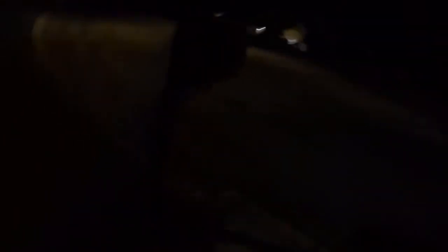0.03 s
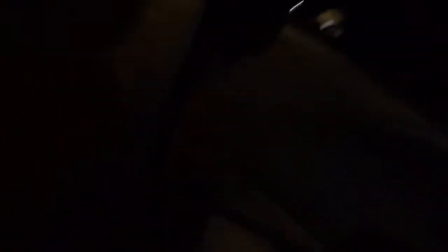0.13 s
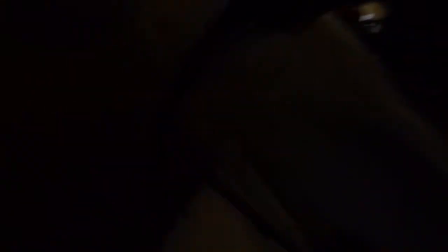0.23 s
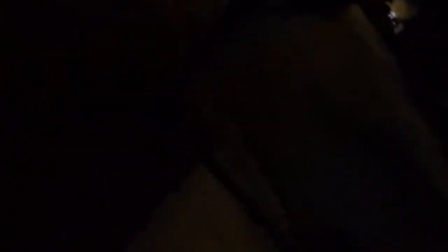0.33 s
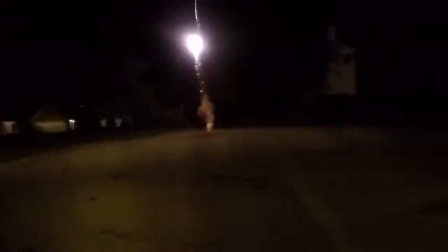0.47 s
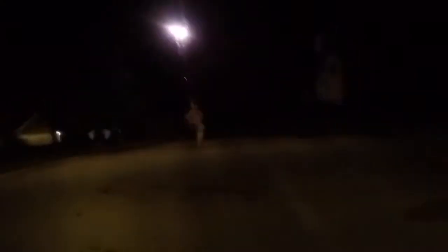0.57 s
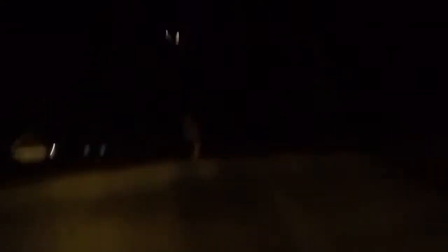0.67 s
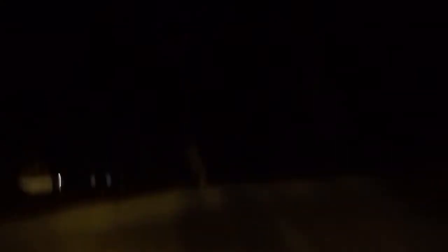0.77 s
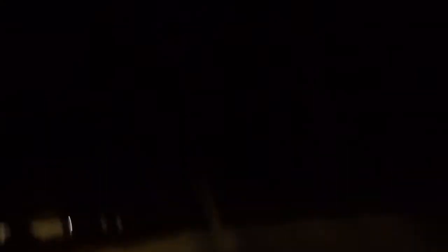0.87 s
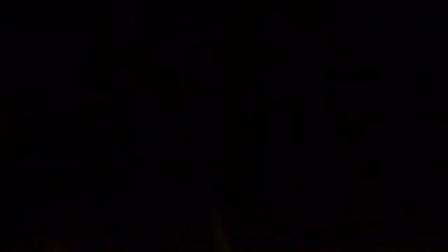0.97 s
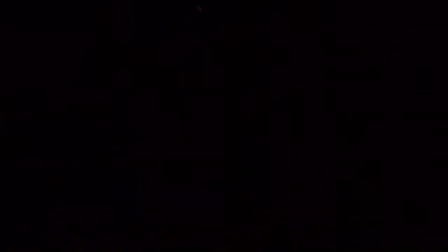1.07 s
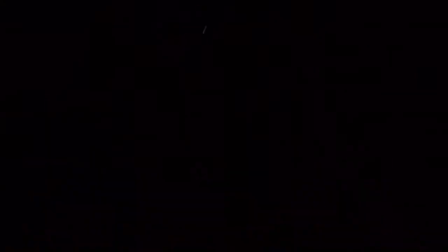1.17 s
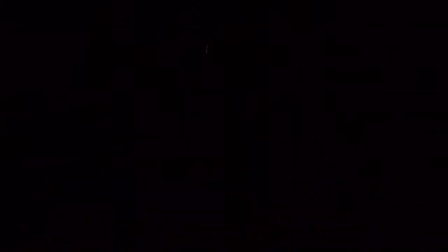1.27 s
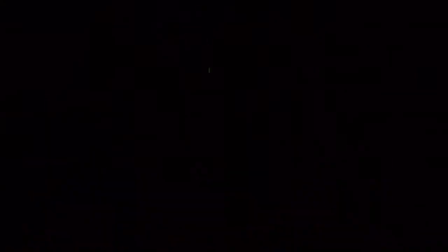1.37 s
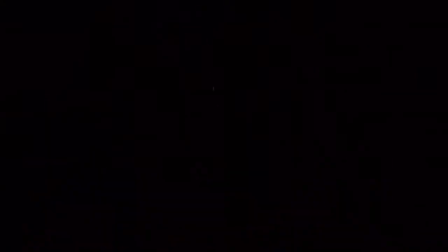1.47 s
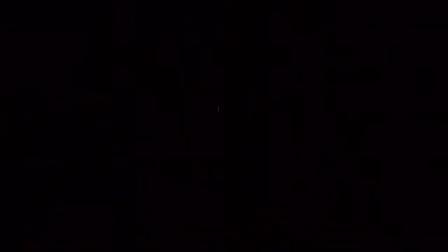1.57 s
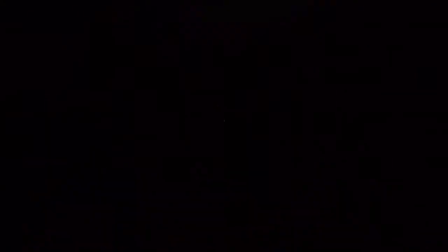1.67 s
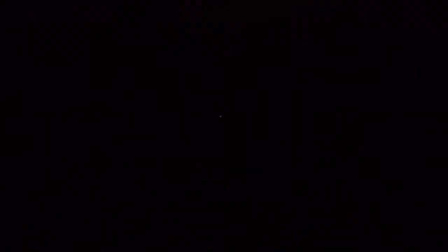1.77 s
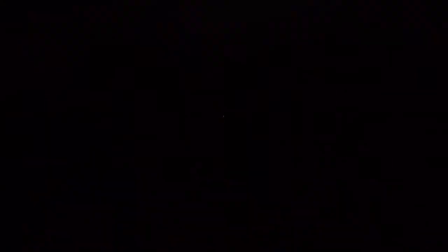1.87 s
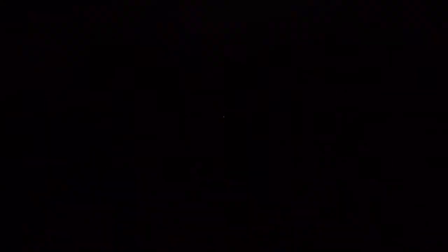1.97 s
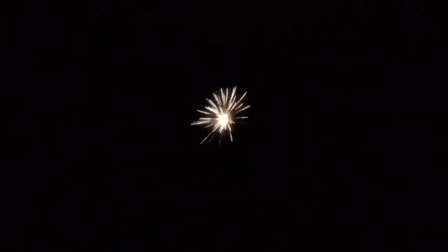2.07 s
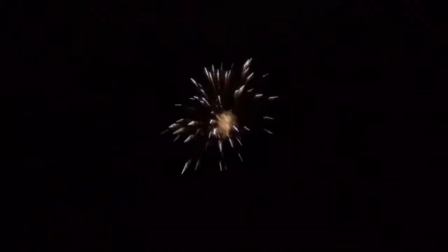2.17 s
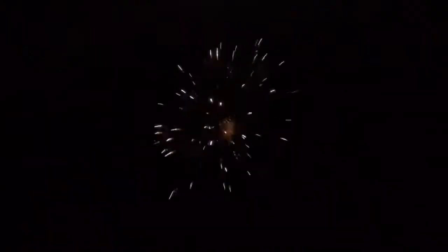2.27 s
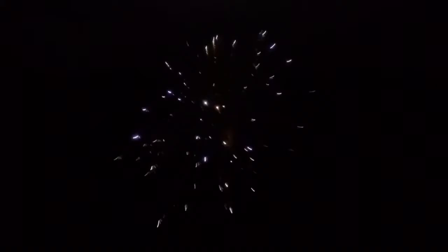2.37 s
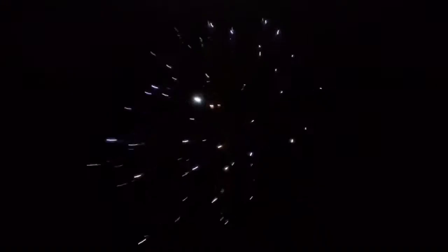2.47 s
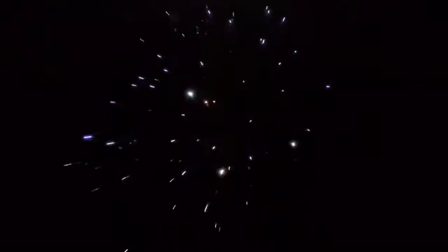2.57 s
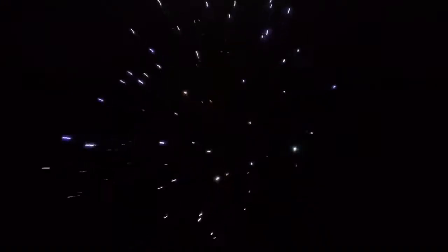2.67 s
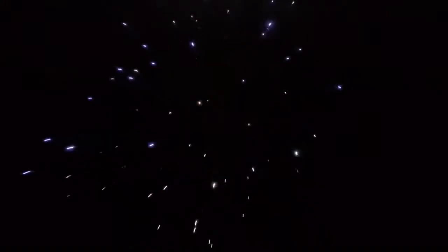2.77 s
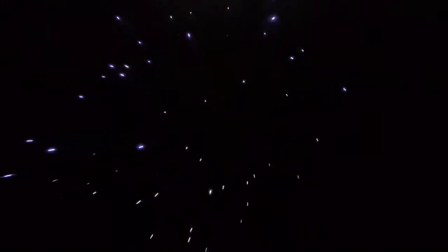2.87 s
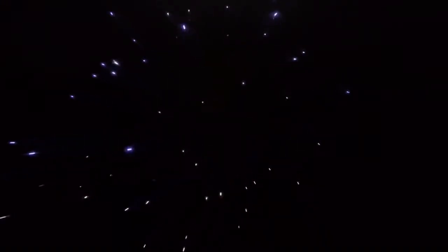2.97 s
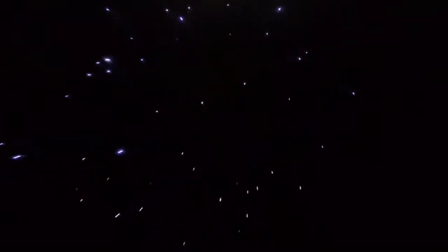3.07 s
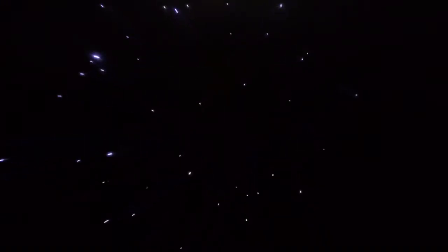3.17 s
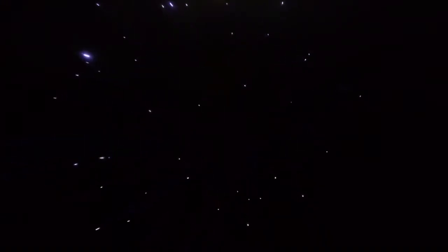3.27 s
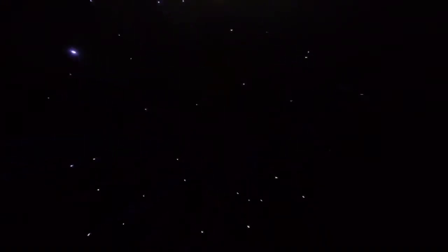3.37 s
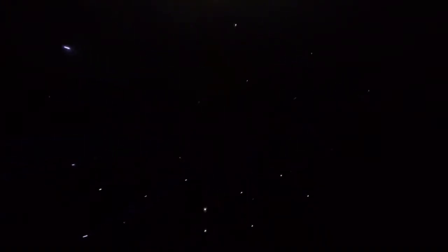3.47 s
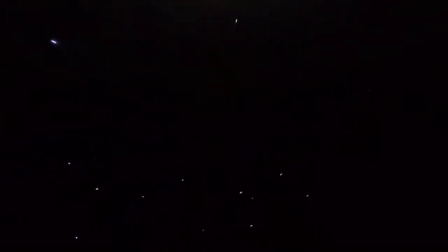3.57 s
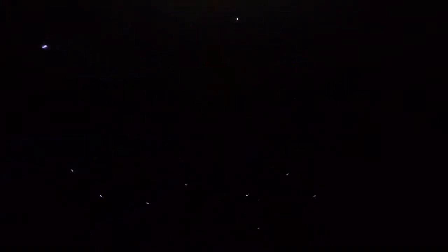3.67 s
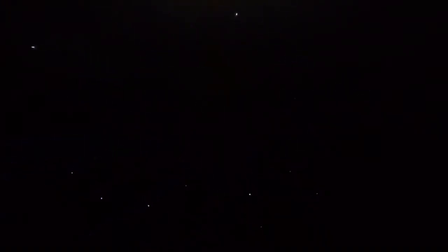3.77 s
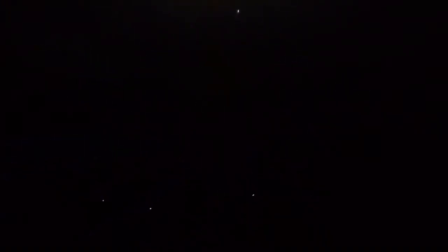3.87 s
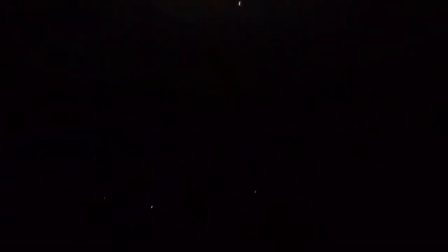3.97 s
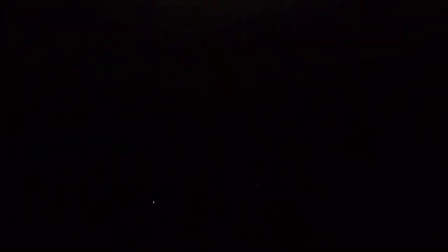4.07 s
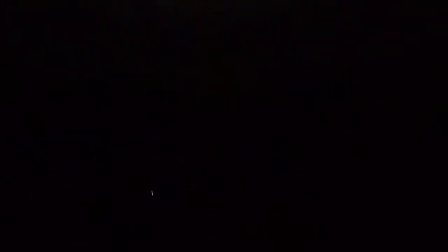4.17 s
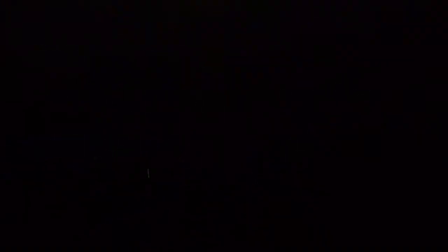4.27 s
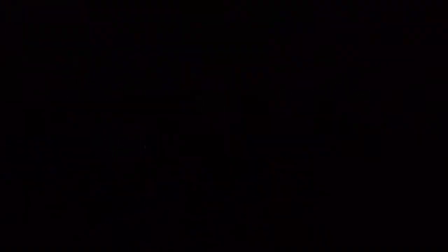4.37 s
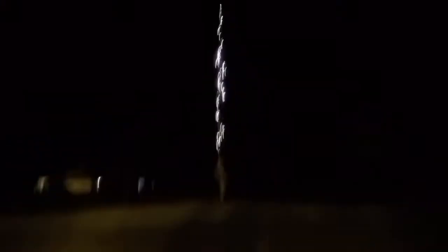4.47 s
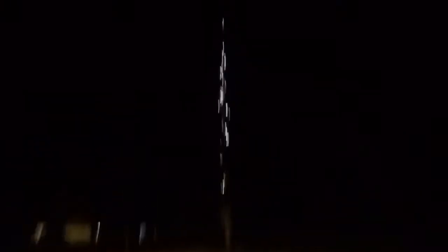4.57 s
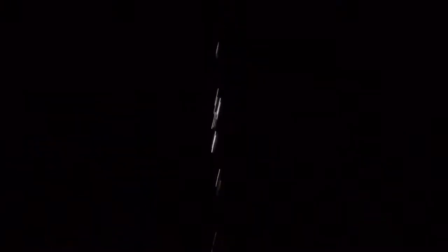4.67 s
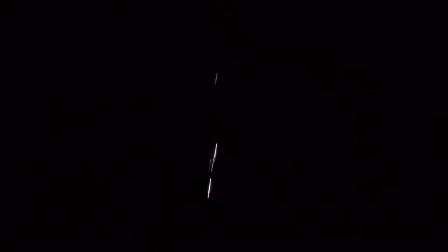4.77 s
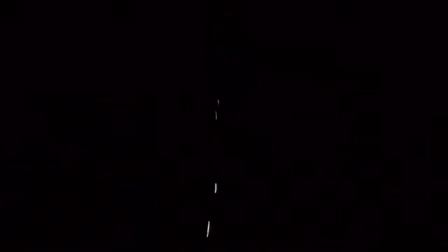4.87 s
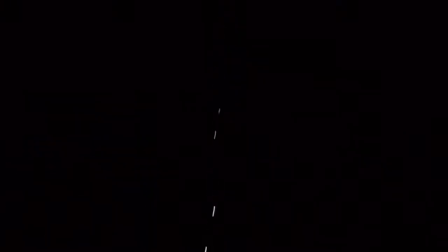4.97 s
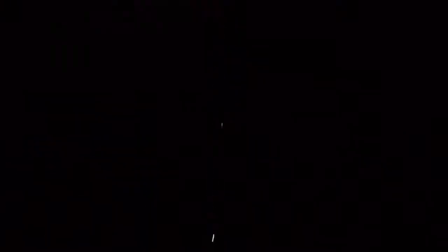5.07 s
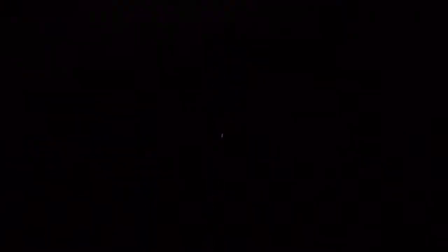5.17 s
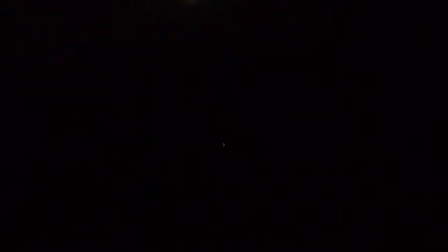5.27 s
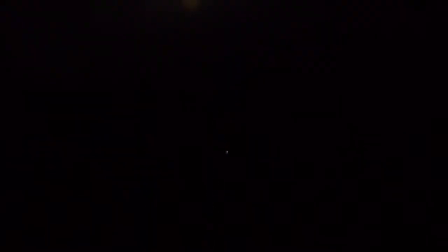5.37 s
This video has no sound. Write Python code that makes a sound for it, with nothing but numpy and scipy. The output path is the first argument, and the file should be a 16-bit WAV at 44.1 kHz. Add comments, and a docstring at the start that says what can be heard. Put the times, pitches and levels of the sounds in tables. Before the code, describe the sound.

Outdoors at night, a hand-held microphone is rubbed and knocked while a cricket trills. At half a second a launch thumps and cracks with a short echo. After a rumbling breeze, a shell bursts overhead at 2.2 seconds, very sharp, its echo swelling and rolling away. Insects creep back; a softer launch thumps at 4.5, then crickets and a light handling knock.

```python
"""Small fireworks at night

Two launches thump and one shell cracks overhead over an open lot: damped pressure swings, two-lobed pulses, crackle.
Each returns from the trees as a swelling, rolling echo made of shaped noise. Noise bands form the distant
insects and a nearer hissing one; sagging tones form a cricket's trills at the start and the end.
A breeze rumbles on the ports of a hand-held microphone, jostled mostly at first by rubs and knocks.
The recorder's gain control ducks at each shot and slowly lets the night back in."""
import sys
import numpy as np
from scipy import signal
from scipy.fft import rfft, irfft, next_fast_len
from scipy.io import wavfile
from scipy.ndimage import uniform_filter1d, minimum_filter1d

SR = 44100
rng = np.random.default_rng(int(sys.argv[2]) if len(sys.argv) > 2 else 0)


def wav_record(signal):
    """Record a signal, one row per channel, as 16-bit PCM in the file named by sys.argv[1]."""
    frames = np.transpose(np.atleast_2d(signal))
    bounded = np.clip(frames, -1, 1)
    # unit amplitude maps onto the largest positive 16-bit level
    quanta = np.round(bounded * 32767).astype(np.int16)
    wavfile.write(sys.argv[1], SR, quanta)


N = 238889
TIME = np.arange(N) / SR

# Breeze on the ports, and a far rumble that gathers before the burst: start_s, level_db
BREEZE_LEVEL = [(0, -16.5), (.12, -11.5), (.22, -12), (.27, -15.5), (.4, -11.5), (.5, -38), (1, -32.5),
                (1.12, -27), (1.38, -23), (1.5, -21), (1.62, -24.5), (1.88, -24), (1.97, -32.5),
                (2.13, -27), (2.3, -43), (2.45, -23), (3, -31), (3.75, -33), (4, -38), (4.45, -32),
                (4.65, -26), (5.42, -25.5)]
RUMBLE_LEVEL = [(1, -59), (1.35, -41.5), (1.5, -55.5), (1.74, -56), (1.8, -53), (1.88, -43), (1.95, -45.5),
                (2.12, -47), (2.5, -70)]
# Spectra of wind, rumble and the hush of the night: frequency_hz, relative density_db (per Hz)
WIND_COLOUR = [(12, -7.5), (28, -2.5), (42, 1.5), (60, -15.5), (85, -22), (150, -33), (250, -40),
               (450, -52), (1000, -56), (3000, -90)]
RUMBLE_COLOUR = [(50, -11), (110, 2.5), (180, 0), (300, -9.5), (450, -20), (900, -37), (3000, -65)]
NIGHT_COLOUR = [(40, 7.5), (150, -10), (260, -7), (450, -8.5), (900, -29), (1500, -38), (2500, -16.5),
                (5000, -65), (9000, -41.5), (16000, -86)]
# Swells of the insect chorus, and bouts of the nearer insect: start_s, length_s, level_db
CHORUS_WAVES = [(-.3, 0.057, -45.5), (1.385, 0.42, -52.5), (3.244, 0.74, -55), (4.99, 0.24, -52.5)]
BUZZ_BOUTS = [(-.1, 0.3, -46.5), (2.118, 0.1, -52), (5.058, 0.4, -50)]
# Spectra of the chorus, far crickets and nearer insect: frequency_hz, relative density_db (per Hz)
CHORUS_COLOUR = [(1000, -27), (1700, -11), (2150, -1), (2450, -8.5), (3100, 2), (3800, -3), (4700, 2.5),
                 (5600, 1), (6400, -6), (7000, -23), (8300, -37), (9700, -24), (13000, -28), (16000, -38)]
CRICKET_COLOUR = [(4500, -49), (5500, -7), (5850, 8), (6150, 6.5), (6400, -0.5), (6800, -31), (8500, -69)]
BUZZ_COLOUR = [(3500, -23), (4600, -4.5), (5300, -4), (6050, 5), (6500, -11), (7500, -20), (9000, -35),
               (13000, -50), (16000, -66)]
# The hand slides on the case: middle_s, half_length_s, rub_db, swish_db
HAND_RUBS = [(0.004, 0.022, -5.5, -34.5), (0.049, 0.019, -19, -23), (0.073, 0.023, -5.5, -40),
             (0.15, 0.087, -40, -42), (0.27, 0.028, -29, -58.5), (0.342, 0.0076, -18.5, -57)]
# Finger knocks on the case: start_s, level_db, pitch_hz, clack_db, tick_db, left_minus_right_db,
# far_port_share (-1 to 1, negative pushes the ports opposite ways)
FINGER_KNOCKS = [(.001, -2.5, 230, -16.5, -12.5, -2.5, -0.71), (0.066, -6, 90, -12.5, -25, -11, -0.55),
                 (0.127, -1.5, 24.3, -20, -14, 5, 0.86), (0.199, -18, 109, -42.5, -56, 10, 0.8),
                 (0.2293, -3, 370, -27, -58, -2.5, -0.4), (0.2318, 1.5, 114, -45, -60, 4.5, -0.78),
                 (0.252, -10, 176, -44, -53, -2, -0.4), (0.274, -5, 191, -49, -62, 0, -0.5),
                 (0.277, -4, 32.2, -48, -60, 6, 0.15), (0.286, -14, 340, -50, -58, 0, -0.89),
                 (0.333, -18, 202, -37, -57, 6, -0.23), (0.387, -1, 57.4, -39, -44, 1.5, -0.56),
                 (1.792, -40, 230, -56, -65, -6, -0.96), (1.97, -32, 218, -60, -68, -6, -0.88),
                 (2.135, -32, 230, -57, -63, 0, -0.77), (5.279, -45, 200, -42, -36, -8, -0.5),
                 (5.409, -20.5, 280, -29.5, -49, -14, 0.36)]
# Spectra of rub and swish: frequency_hz, relative density_db (per Hz)
RUB_COLOUR = [(40, 17), (90, 7.5), (180, -6.5), (330, 4.5), (520, -4.5), (700, -11), (950, -10.5),
              (1300, -8.5), (1800, -24), (2300, -23), (3200, -39), (8000, -71)]
SWISH_COLOUR = [(800, 5.5), (2000, 6.5), (3800, -5), (5800, 5.5), (7500, -2.5), (10000, -19), (13000, -27),
                (16000, -43)]
# Trills of the near cricket: start_s, length_s, first_rate_hz, last_rate_hz (wing strokes),
# first_level_db, last_level_db
CRICKET_TRILLS = [(.097, .315, 61.5, 55.5, -36.5, -43), (5.204, .21, 55.2, 55.2, -42, -34)]
# Echoes that swell, fade and roll on: start_s, swell_s, boom_db, roar_db, boom_fade_db_per_s, roar_fade_db_per_s,
# roll_below_peak_db, roll_fade_db_per_s, dulling_db_per_s, ground_bounce (0 to 1), bounce_lag_s, grain_db, lumps_db
LAUNCH_ECHO_ROWS = [(0.464, 0.037, -18.5, -28, 38, 21, 29, 13.5, 49, 0.38, 0.0033, 1.5, 0.2),
                    (0.645, 0.013, -18, -28, 61, 58.5, 17.5, 40, -1, 1, 0.0033, 1.5, 0.6),
                    (4.502, 0.035, -30, -38, 44, 43.5, 17.5, 0.5, 24, 0.25, 0.00236, 1, 0.74)]
BURST_ECHO_ROWS = [(2.229, 0.064, -21, -29, 77, 26, 75, 60, 49, 0.14, 0.003, 0.8, 0.13),
                   (2.3, 0.16, -13, -23, 72, 43.4, 7.97, 14.83, 20.4, 0.033, 0.00334, 0.92, 0.2)]
# Spectra of the echoes' low boom and higher roar: frequency_hz, relative density_db (per Hz)
LAUNCH_BOOM_COLOUR = [(40, -12.5), (85, 2.5), (135, 2), (200, -3.5), (300, -11.5), (390, -20), (520, -20),
                      (750, -58), (1500, -86)]
LAUNCH_ROAR_COLOUR = [(250, -17), (400, -1), (600, 1.5), (790, 0), (950, 1), (1400, 0.5), (2100, -2),
                      (2800, -4), (3400, -3.5), (4400, -5.5), (5900, -4), (7200, -8.5), (8500, -20),
                      (10500, -31.5), (13000, -40), (16000, -50)]
BURST_BOOM_COLOUR = [(40, -14.5), (90, -3.5), (140, -4), (220, -2.5), (300, -3), (410, -5), (540, -18),
                     (800, -17.5), (1500, -74)]
BURST_ROAR_COLOUR = [(250, -30), (500, -1.5), (680, -7), (950, 2.5), (1400, -1), (2250, -3.5), (2900, -4),
                     (3400, -5.5), (4400, -7), (5900, -5), (7200, -8.5), (8500, -21), (10500, -31),
                     (13000, -37.5), (16000, -48)]
# Low bodies of the reports: start_s, level_db, pitch_hz
REPORT_THUMPS = [(0.475, -10.5, 178), (0.497, -11, 302), (0.502, -8.5, 186), (.527, -7.5, 172),
                 (0.577, -9, 153), (0.621, -14, 140), (0.665, -0.5, 133), (0.679, -4, 139),
                 (0.686, -2, 161), (0.734, -11, 190), (0.755, -8, 137), (0.784, -12, 141),
                 (2.1995, -24, 400), (2.204, -16, 200), (2.2105, -3, 170), (2.2114, -9, 440),
                 (2.2168, -5, 170), (2.2316, -1, 211), (2.2212, 5, 455), (2.279, -2.5, 126),
                 (2.432, -1, 198), (2.469, -23, 200.5), (4.5132, -22, 198), (4.5185, -14, 133),
                 (4.553, -25.5, 360), (4.561, -23, 374), (4.586, -14.5, 118), (4.682, -22, 150)]
# Ragged clumps of crackle in the launches and the burst: middle_s, level_db, length_s, centre_hz
CRACKLE_CLUMPS = [(0.499, -30, 0.004, 3500), (0.51, -34, 0.003, 1840), (0.52, -29.5, 0.0075, 900),
                  (0.574, -37, 0.0023, 1300), (0.599, -36, 0.0027, 2100), (0.644, -28, 0.0058, 2800),
                  (0.6607, -17.5, 0.002, 2330), (0.661, -19.5, 0.0025, 543), (0.68, -27, 0.0072, 3200),
                  (0.688, -20.5, 0.0073, 546), (0.689, -26, 0.0075, 1900), (0.714, -27.5, 0.0062, 1210),
                  (0.734, -25, 0.0024, 686), (0.754, -33, 0.0037, 500), (2.212, -26, 0.0011, 4000),
                  (2.2137, -25, 0.0027, 700), (2.2158, -30, 0.0019, 1500), (2.2172, -15, 0.0007, 1000),
                  (4.521, -44, 0.013, 1600), (4.542, -41.5, 0.013, 2620), (4.559, -46, 0.003, 900),
                  (4.608, -45, 0.017, 1700), (4.662, -50, 0.022, 1500), (4.754, -50.5, 0.035, 1494)]
# Sharp cracks, with fainter, evenly spaced clicks leading into and following the loudest: middle_s, level_db,
# lobe_s, top_edge_hz
CRACK_ROWS = [(0.502, -34, 0.00078, 3500), (0.661, -13.5, 0.0017, 3490), (0.694, -27, 0.00014, 5000),
              (0.712, -22, 0.00024, 6100), (2.1775, -43, 0.0005, 2500), (2.188, -35, 0.0011, 1200),
              (2.199, -34, 0.0009, 3000), (2.2101, -9.5, 0.0008, 3000), (2.2308, -11, 0.0009, 1900),
              (2.22, 10, 0.00074, 7250), (2.2226, -17, 0.0006, 6000), (4.5625, -31, 0.00061, 3000)]
# Spectra of the hollow clumps and of the puffs around the cracks: frequency_hz, relative density_db (per Hz)
CLUMP_COLOUR = [(300, -4), (580, 8), (790, -6), (980, 5), (1250, 2), (1700, 3.5), (2150, 0), (2750, -4),
                (3400, -3.5), (4400, -5), (5900, -1), (9000, -21), (16000, -52)]
PUFF_COLOUR = [(100, -26), (450, 16), (1000, -0.5), (1800, -12.5), (3800, -7), (6000, -12), (8500, -29),
               (13000, -32), (16000, -59)]
# Stereo width of echoes, open air and handling: frequency_hz, side_minus_mid_db
ECHO_SPREAD = [(60, -14), (110, -20), (200, -20.5), (380, -13.5), (700, -2), (1300, 0), (4400, -5),
               (8000, 2.5)]
AIR_SPREAD = [(55, 8.5), (110, 1.5), (200, -10), (700, 1), (2400, -6.5), (8000, -0.5)]
HAND_SPREAD = [(100, 11.2), (1200, 10.8), (4000, 0.38)]
# Brief dips of the level: start_s, end_s, level_db
LEVEL_DIPS = [(0.424, 0.468, -43), (4.484, 4.508, -13)]


def from_db(db):
    """Level is logarithmic: decibels become an amplitude ratio."""
    return 10 ** (np.asarray(db) / 20)


def rms_one(x):
    """Normalisation: the mean square becomes one."""
    return x / np.sqrt(np.mean(x ** 2) + 1e-20)


def in_time(rows):
    """Linear interpolation: each column of a curve at every sample."""
    s, *columns = np.transpose(rows)
    return [np.interp(TIME, s, column) for column in columns]


def at_hz(points, hz):
    """Linear interpolation of a spectrum along a logarithmic frequency axis."""
    frequency, value = np.transpose(points)
    return np.interp(np.log(hz + 1), np.log(frequency), value)


def cut(x, hz, kind, order=2):
    """Butterworth filtering: a low-pass or high-pass with a flat passband."""
    sos = signal.butter(order, min(hz, SR / 2 - 1), kind, fs=SR, output="sos")
    return signal.sosfilt(sos, x + 1e-18)


def pan(db):
    """Level difference between the ears: left and right gains, positive towards the left."""
    return from_db(np.array([[db], [-db]]) / 2)


def drift(rate_hz):
    """Random fluctuation: chance values joined by lines, rate_hz of them a second, scaled to unit power."""
    return rms_one(np.interp(TIME * rate_hz, np.arange(N), rng.standard_normal(N)))


def noise(spectrum, width, grain_db=None):
    """Spectral shaping: coloured mid and side noise; grain gathers it into uneven millisecond packets."""
    size = next_fast_len(N)
    hz = np.arange(size // 2 + 1) * SR / size
    white = rng.standard_normal((2, N))
    if grain_db is not None:
        white = white * from_db(grain_db * drift(900))
    mid, side = rfft(white, size)
    spread = from_db(at_hz(width, hz))
    both = (mid + side * spread * [[1], [-1]]) / np.sqrt(1 + spread ** 2)
    coloured = both * from_db(at_hz(spectrum, hz))
    return rms_one(irfft(coloured, size)[:, :N])


def evened(x, window_s):
    """Power equalisation: irons out a noise's chance swells so that it follows the envelope it is given."""
    size = int(window_s * SR) + 1
    power = np.mean(x ** 2, axis=0)
    for _ in range(2):
        power = uniform_filter1d(power, size=size)
    return x / np.sqrt(power + 1e-6)


def bouts(rows, rise_s, fall_s):
    """Superposed envelopes: each bout rises linearly, holds, then decays exponentially."""
    level = 0
    for s, length, db in rows:
        rise = np.clip((TIME - s) / rise_s, 0, 1)
        fall = np.exp(-np.maximum(TIME - s - length, 0) / fall_s)
        level = level + from_db(db) * rise * fall
    return level


def thud(s, hz, cycles):
    """Damped oscillation: a heavily damped swing of pressure, decaying over the given cycles."""
    phase = np.clip((TIME - s) * hz, 0, 20)
    return np.sin(2 * np.pi * phase) * np.exp(-phase / cycles)


def air(night_db=-53, wind_pan_db=-5, gust_db=1.0, waver_db=0.5):
    """Turbulence as noise: lumpy wind on the ports, a far wavering rumble and the faint hush of the night."""
    breeze_db, = in_time(BREEZE_LEVEL)
    rumble_db, = in_time(RUMBLE_LEVEL)
    gusts = from_db(breeze_db + gust_db * drift(8.1))
    wind = gusts * evened(noise(WIND_COLOUR, AIR_SPREAD), window_s=0.09) * pan(wind_pan_db)
    rumble = from_db(rumble_db + waver_db * drift(18)) * noise(RUMBLE_COLOUR, ECHO_SPREAD)
    return wind + rumble + from_db(night_db) * noise(NIGHT_COLOUR, AIR_SPREAD)


def insects(throb_hz=11, throb_db=2.5, flicker_hz=55):
    """Incoherent summation: a distant chorus swells and throbs as noise; far crickets blur into a narrow band."""
    lull = from_db(-69)  # chorus between waves
    level = lull + bouts(CHORUS_WAVES, rise_s=0.3, fall_s=0.57)
    throb = throb_db * np.sin(2 * np.pi * throb_hz * TIME + 3.4 * drift(3.58))
    chorus = level * from_db(throb) * noise(CHORUS_COLOUR, AIR_SPREAD)
    # The far crickets follow only a small share of the chorus's swell
    crickets = from_db(-56.5 + 1.7 * drift(flicker_hz)) * (level / lull) ** 0.06
    return chorus + crickets * noise(CRICKET_COLOUR, AIR_SPREAD)


def near_buzz(flutter_db=2.5):
    """Amplitude modulation: a nearer insect's noise band hisses in short, fluttering bouts."""
    level = bouts(BUZZ_BOUTS, rise_s=0.061, fall_s=0.035)
    return level * from_db(flutter_db * drift(120)) * noise(BUZZ_COLOUR, AIR_SPREAD)


def contact(force, low_hz, high_hz):
    """Rough contact: the force modulates noise, heard through one band of the case."""
    rough = force * rng.standard_normal((2, N)) * np.sqrt(SR / 2 / high_hz)
    return cut(cut(rough, high_hz, "low", order=5), low_hz, "high", order=1)


def handling(tick_s=0.00078, clack_s=0.002):
    """Friction and impact: a hand rubs and knocks the case, mostly pushing its two ports opposite ways."""
    rub = swish = 0
    for s, half_length, rub_db, swish_db in HAND_RUBS:
        slide = np.exp(-((TIME - s) / half_length) ** 2)
        rub = rub + from_db(rub_db) * slide
        swish = swish + from_db(swish_db) * slide
    out = rub * noise(RUB_COLOUR, HAND_SPREAD, grain_db=4.5)
    out = out + swish * noise(SWISH_COLOUR, HAND_SPREAD, grain_db=2.0)
    clacks = ticks = 0
    for s, db, hz, clack_db, tick_db, pan_db, far_port in FINGER_KNOCKS:
        age = np.clip(TIME - s, 0, .1)
        sides = pan(pan_db) * (age > 0)
        push = np.array([[-1], [-np.clip(far_port, -1, 1)]])
        out = out + sides * from_db(db) * thud(s, hz, cycles=0.72) * push
        clacks = clacks + sides * from_db(clack_db) * np.exp(-age / clack_s)
        ticks = ticks + sides * from_db(tick_db) * np.exp(-age / tick_s)
    out = out + contact(clacks, low_hz=248, high_hz=960)
    return out + contact(ticks, low_hz=1390, high_hz=4700)


def wing_strokes(uneven_db=-2.0):
    """Stridulation: each trill is a run of strokes that grows or fades, and may slow; rows of (s, dB)."""
    rows = []
    for s, length, first_rate, last_rate, first_db, last_db in CRICKET_TRILLS:
        age = 0
        while age < length:
            db = np.interp(age, [0, length], [first_db, last_db])
            rows.append((s + age, db + uneven_db * rng.standard_normal()))
            age += 1 / np.interp(age, [0, length], [first_rate, last_rate])
    return rows


def near_cricket(pitch_hz=5130, fall_hz=720, half_s=0.007, port_phase=2.2, rasp=0.011):
    """Frequency modulation: a rasping tone sags as the wing slows and reaches the two ports out of step."""
    out = np.zeros((2, N))
    waver = 1 + rasp * drift(2800)
    for s, db in wing_strokes():
        detune, start = rng.standard_normal(2)
        near = np.abs(TIME - s) < half_s
        stroke = (TIME[near] - s) / half_s  # -1 to 1
        hz = (pitch_hz + 50 * detune - fall_hz * stroke) * waver[near]
        phase = 2 * np.pi * np.cumsum(hz) / SR + start
        tone = np.sin(phase + np.array([[port_phase], [0]]))
        out[:, near] += from_db(db) * np.cos(np.pi / 2 * stroke) ** 2 * tone
    return out * pan(1.4)


def ground_bounce(x, lag_s, strength):
    """Interference: a dull copy off the ground, a moment later, combs the spectrum."""
    late = np.array([np.interp(TIME - lag_s, TIME, side) for side in x])
    dull = signal.sosfiltfilt(signal.butter(1, 3500, fs=SR, output="sos"), late)
    return rms_one(x + strength * dull)


def echo(boom_colour, roar_colour, row):
    """Diffuse reflection: countless returns from trees; later ones have come further and lost treble."""
    (s, swell_s, boom_db, roar_db, boom_fade, roar_fade, roll_db, roll_fade,
     dulling_db, bounce, bounce_s, grain_db, lumps_db) = row
    age = np.maximum(TIME - s, 0)
    past_peak = np.maximum(TIME - s - swell_s, 0)
    swell = np.minimum(age / swell_s, 1)
    roll = from_db(-roll_db - roll_fade * past_peak)
    boom = from_db(boom_db) * np.hypot(from_db(-boom_fade * past_peak), roll)
    roar = from_db(roar_db) * np.hypot(from_db(-roar_fade * past_peak), roll)
    lumpy = noise(roar_colour, ECHO_SPREAD, grain_db) * from_db(lumps_db * drift(110))
    scatter = ground_bounce(lumpy, bounce_s, bounce)
    dull = signal.sosfiltfilt(signal.butter(2, 2400, fs=SR, output="sos"), scatter)
    treble = (scatter - dull) * from_db(-dulling_db * np.maximum(age - .2, 0))
    low = boom * evened(noise(boom_colour, ECHO_SPREAD), window_s=0.07)
    return swell * (low + roar * (dull + treble))


def thumps(low_hz=75):
    """Damped oscillation: brief low swings give each report its body."""
    body = sum(from_db(db) * thud(s, hz, cycles=0.78) for s, db, hz in REPORT_THUMPS)
    return cut(body, low_hz, "high")


def sputters(width_db=-4):
    """Band-limited noise: short clumps of coarse crackle, each strongest around its own pitch."""
    out = np.zeros((2, N))
    grit = noise(CLUMP_COLOUR, [(100, width_db), (8000, width_db)], grain_db=1.0)
    for s, db, length, hz in CRACKLE_CLUMPS:
        near = np.abs(TIME - s) < .04
        clump = rms_one(cut(cut(grit[:, near], hz * 2, "low"), hz / 2, "high"))
        out[:, near] += from_db(db) * clump * np.exp(-((TIME[near] - s) / length) ** 2)
    return out


def cracks(sizzle_db=-17, sizzle_s=0.001, low_hz=110, crackle_db=-12, crackle_s=0.0024):
    """Two-lobed pulses: each crack jumps between two lobes, with a short ragged wake and a puff of crackle."""
    out, crackle = np.zeros((2, N)), np.zeros(N)
    for s, db, length, top_hz in CRACK_ROWS:
        near = np.abs(TIME - s) < .02
        age = TIME[near] - s
        lobe_s = np.where(age < 0, length / 2, length)
        pulse = -np.sign(age) * np.exp(-(age / lobe_s) ** 2)
        rough = from_db(sizzle_db) * rng.standard_normal((2, len(age)))
        wake = rough * (age > 0) * np.exp(-np.abs(age) / sizzle_s)
        out[:, near] += from_db(db) * cut(pulse + wake, top_hz, "low")
        crackle[near] += from_db(db + crackle_db) * np.exp(-np.abs(age) / crackle_s)
    return cut(out, low_hz, "high") + crackle * noise(PUFF_COLOUR, ECHO_SPREAD, grain_db=0.0)


def scene():
    """Superposition: the shots, their echoes and the night around them add linearly."""
    night = air() + insects() + near_buzz() + near_cricket()
    launches = sum(echo(LAUNCH_BOOM_COLOUR, LAUNCH_ROAR_COLOUR, row) for row in LAUNCH_ECHO_ROWS)
    burst = sum(echo(BURST_BOOM_COLOUR, BURST_ROAR_COLOUR, row) for row in BURST_ECHO_ROWS)
    return night + handling() + launches + burst + thumps() + sputters() + cracks()


def gain_control(x, window_s=0.014, deaf_below_hz=100):
    """Dynamic compression, gain in dB: loud sounds push it down; it holds, then creeps back up."""
    quiet_gain_db, threshold_db, duck_share = 14.5, -37.5, 0.62  # share of the excess taken away
    hold_s, recovery_db_per_s = 0.7, 17
    heard = cut(x, deaf_below_hz, "high", order=4)
    power = uniform_filter1d(np.mean(heard ** 2, axis=0), size=int(window_s * SR))
    level_db = 10 * np.log10(np.maximum(power, 1e-12))
    duck = duck_share * np.maximum(level_db - threshold_db, 0)
    hold = int(hold_s * SR)
    # Deepest duck within the hold time just past
    held = -minimum_filter1d(-duck, size=hold, origin=(hold - 1) // 2, mode="nearest")
    recovery = recovery_db_per_s * TIME
    return quiet_gain_db - (np.maximum.accumulate(held + recovery) - recovery)


def record(dry):
    """Compression, clipping and band limiting: shots duck the gain, the level dips briefly before the launches."""
    dip_db = sum(db * ((TIME > start) & (TIME < end)) for start, end, db in LEVEL_DIPS)
    gain = uniform_filter1d(from_db(gain_control(dry) + dip_db), size=180)
    overloaded = np.clip(dry * gain, -1, 1)
    top_cut = signal.ellip(10, .3, 80, 15100, fs=SR, output="sos")  # ripple dB, stopband dB, cutoff Hz
    return signal.sosfilt(top_cut, overloaded)


dry = scene()
out = record(dry)
wav_record(out)
```